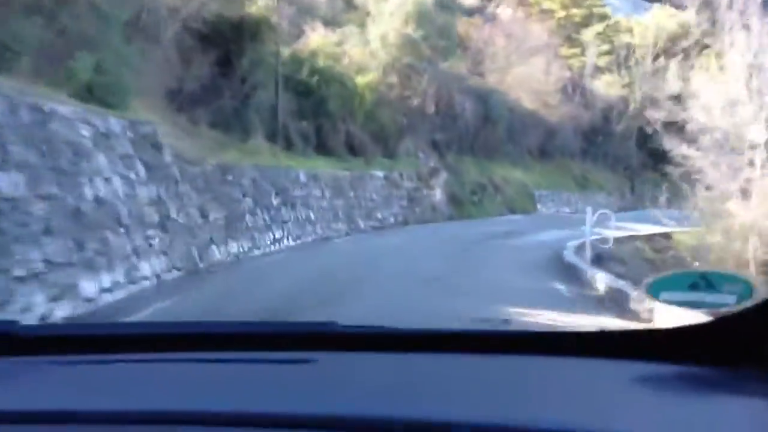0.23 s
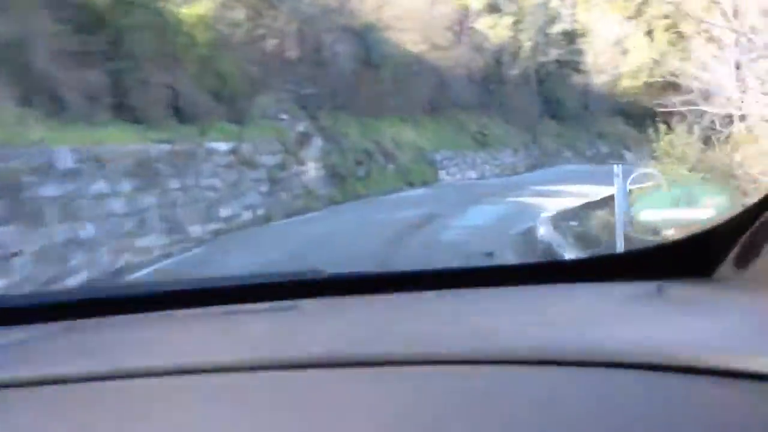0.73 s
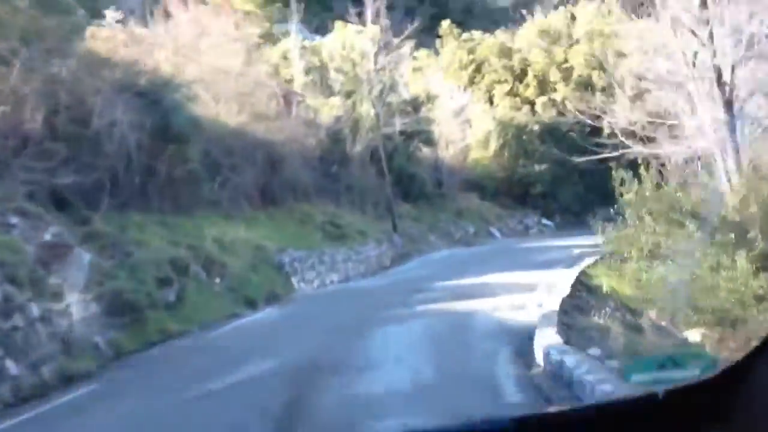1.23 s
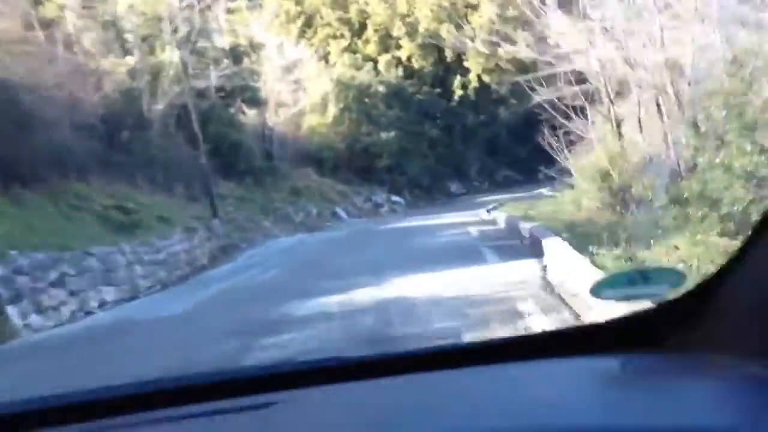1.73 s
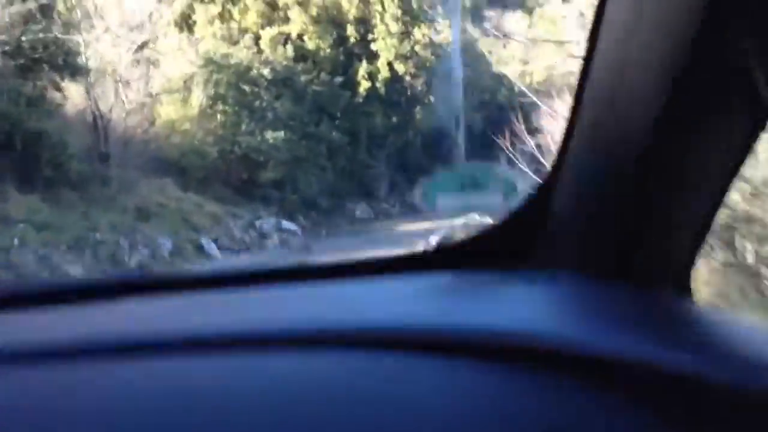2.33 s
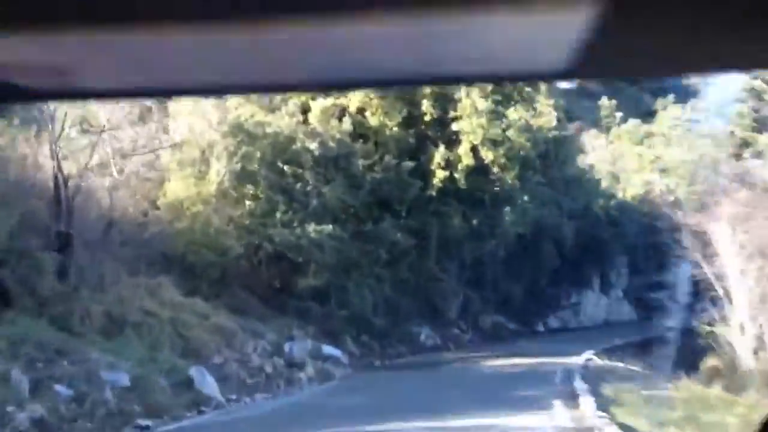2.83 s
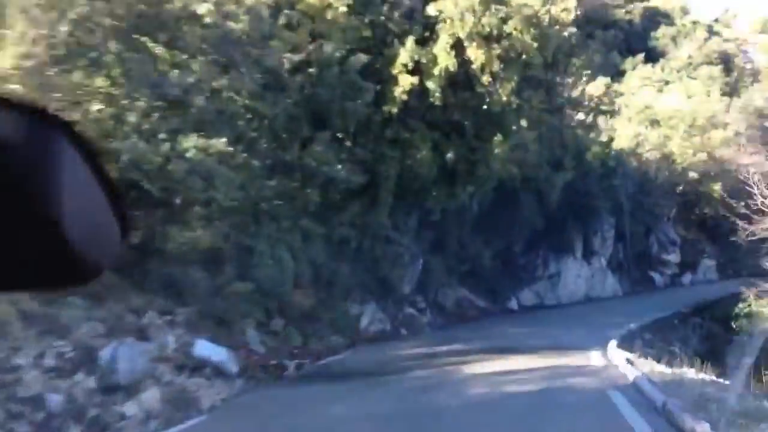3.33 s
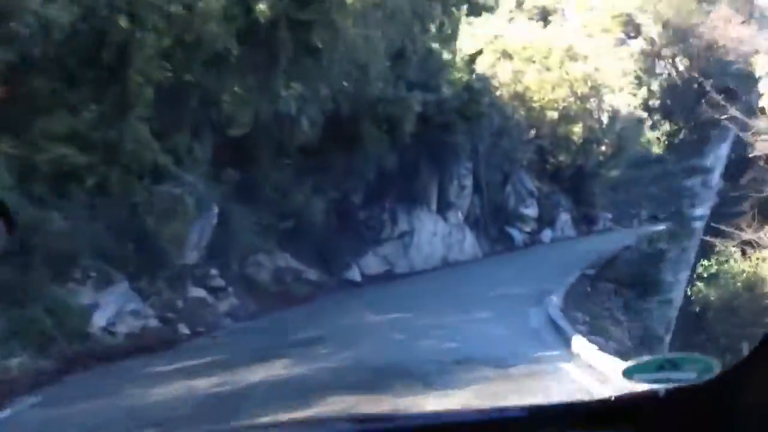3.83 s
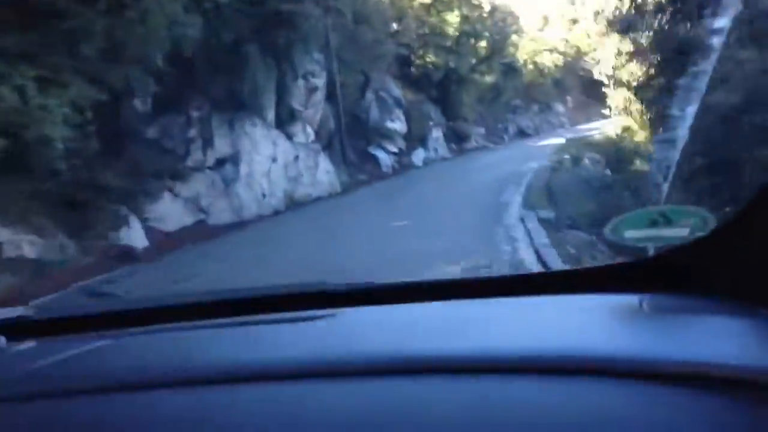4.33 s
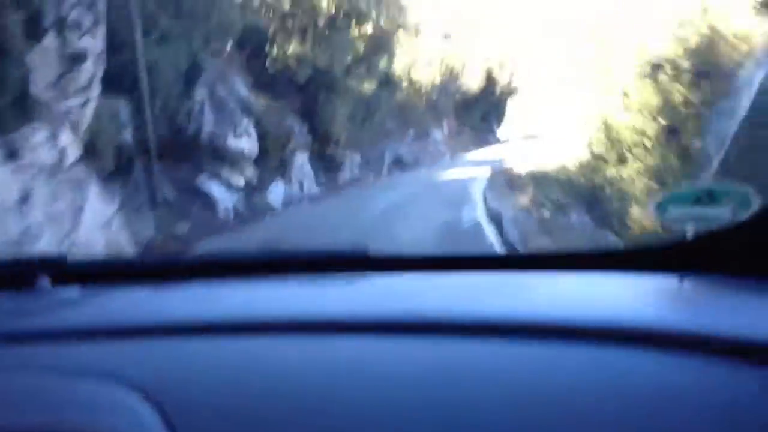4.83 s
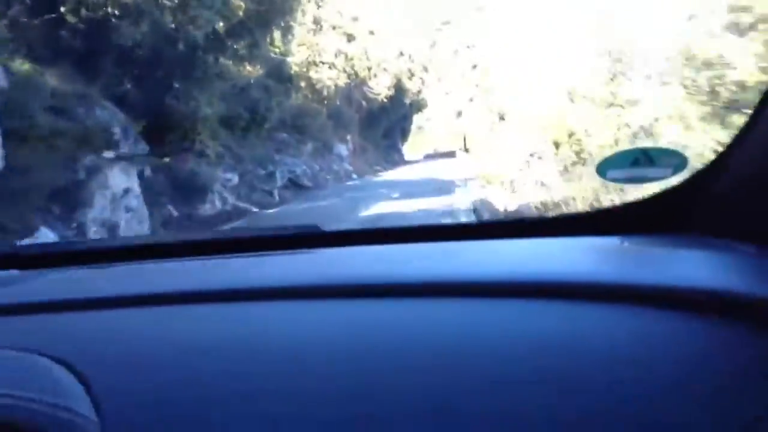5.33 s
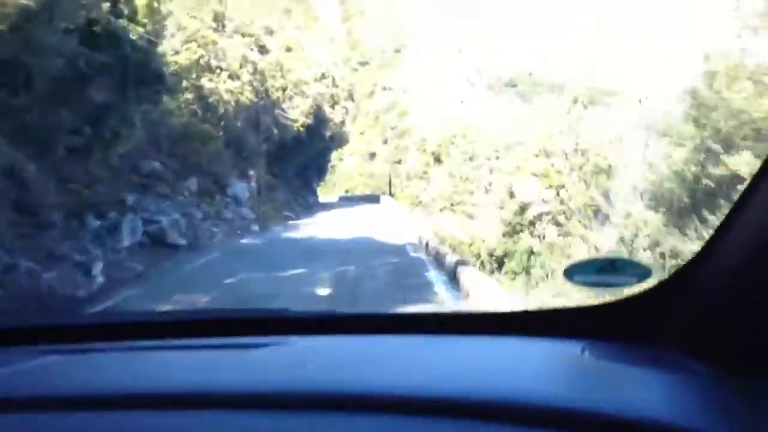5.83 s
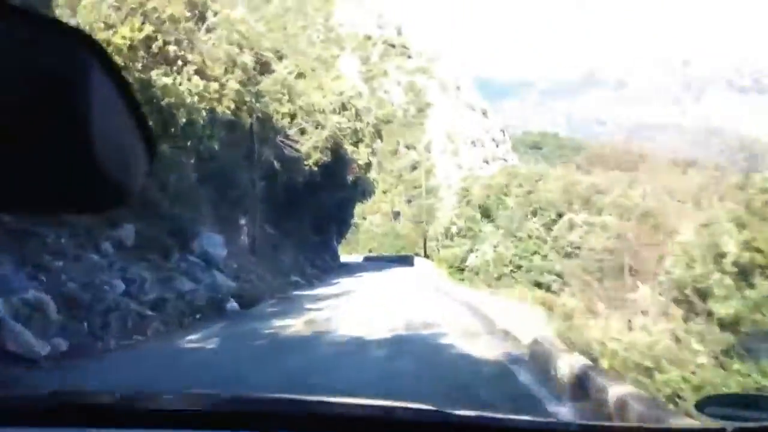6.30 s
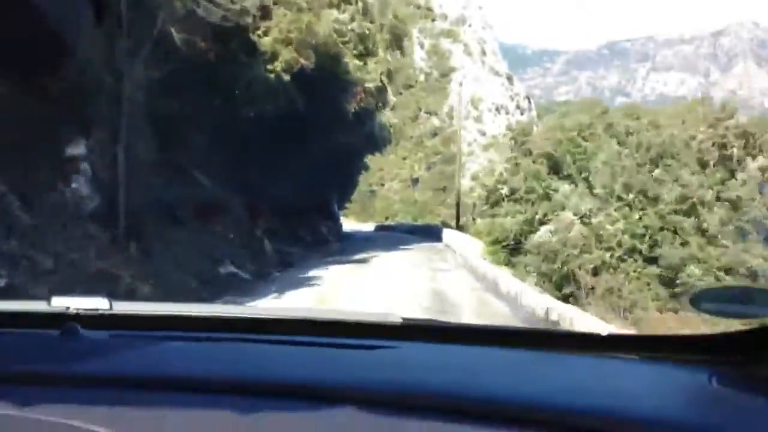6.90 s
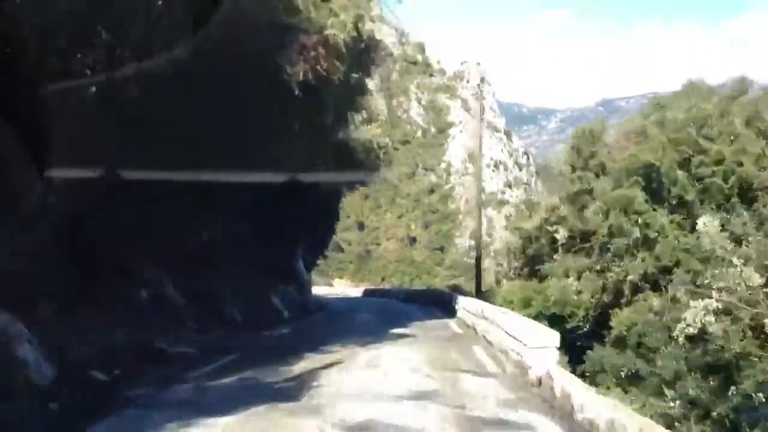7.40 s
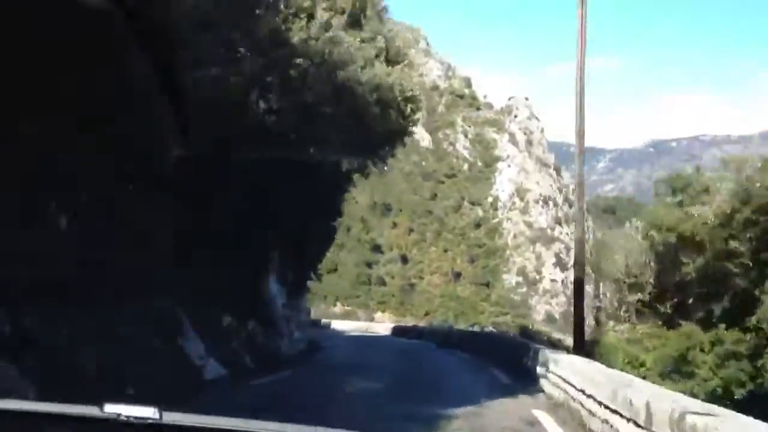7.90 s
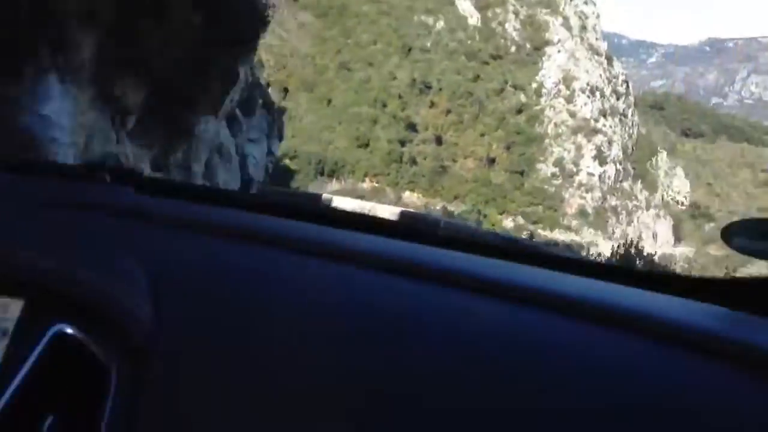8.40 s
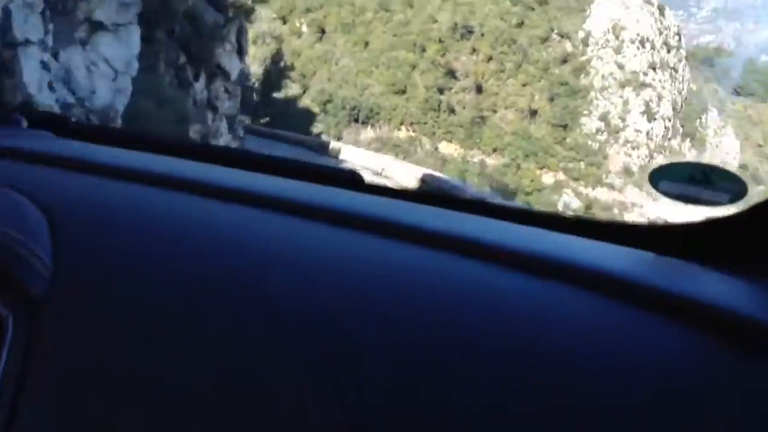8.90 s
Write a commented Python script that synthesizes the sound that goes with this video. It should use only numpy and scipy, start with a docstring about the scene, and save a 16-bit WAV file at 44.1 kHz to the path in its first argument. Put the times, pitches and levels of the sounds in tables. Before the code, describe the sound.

Heard from the front seat of a car on a winding road, a low engine boom dominates, sagging at first, weakest around one and a half seconds, then slowly recovering and climbing to a peak near seven before easing. Muffled tyre rumble and roar run throughout, with fine hiss swelling over damp patches. Short dull bumps and tiny bright ticks interrupt, and the strongest thump comes in the last bend.

```python
"""Inside a car on a winding mountain road: a four-cylinder engine booms in the cabin, rises and falls in pitch.
The engine is a sine at the firing rate plus weaker orders and noise rasp; the tyres are shaped noise that
roars on asphalt, hisses more over damp stretches and murmurs in the last bend.
Bumps thump as decaying sines, grit and trim tick as short noise bursts, and trim squeaks as sinking sines."""
import sys
import numpy as np
from scipy import signal
from scipy.fft import rfft, irfft, next_fast_len
from scipy.io import wavfile
from scipy.ndimage import uniform_filter1d, map_coordinates

SR = 44100
rng = np.random.default_rng(int(sys.argv[2]) if len(sys.argv) > 2 else 0)


def generate_wav(signal):
    """Clip the signal to [-1, 1] and save it as 16-bit WAV at the path in sys.argv[1]."""
    frames = np.transpose(np.atleast_2d(signal))
    scaled = np.clip(frames, -1, 1) * 32767
    pcm = np.round(scaled).astype(np.int16)
    wavfile.write(sys.argv[1], SR, pcm)


N = 403515
CRUISE_HZ = 155  # firing rate at cruising speed
ENTER_S, LEAVE_S = 0.078, 0.14  # stretch of road: rise time, decay constant


def amp(db):
    """Decibels to gain."""
    return 10 ** (np.asarray(db) / 20)


def unit(x):
    """Scale to rms 1."""
    return x / np.sqrt(np.mean(x ** 2) + 1e-20)


def curves(rows):
    """One value per sample for each column after the time."""
    s, *cols = np.transpose(rows)
    return [np.interp(np.arange(N) / SR, s, c) for c in cols]


def wobble(rate_hz):
    """Smooth random curve, rate_hz knots a second."""
    knots = rng.standard_normal(int(N * rate_hz / SR) + 4)
    return map_coordinates(knots, [np.arange(N) * rate_hz / SR])


def filtered(x, response):
    """x times a response of frequency."""
    m = next_fast_len(len(x) + 8192)
    return irfft(rfft(x, m) * response(np.fft.rfftfreq(m, 1 / SR)), m)[:len(x)]


def coloured(x, spectrum):
    """x shaped by (frequency [Hz], level [dB]) points, at rms 1."""
    f, db = np.transpose(spectrum)

    def response(hz):
        shape_db = np.interp(np.log(hz + 1), np.log(f), db)
        rolloff_db = 60 * np.maximum(hz / f[-1] - 1, 0)  # above the last point
        return amp(shape_db - rolloff_db)

    return unit(filtered(x, response))


def patchy(depth_db):
    """White noise whose gain drifts in patches of time and frequency."""
    z = signal.stft(rng.standard_normal(N), nperseg=1024)[2]
    field = uniform_filter1d(rng.standard_normal(z.shape), size=6, axis=0)
    field = uniform_filter1d(field, size=10, axis=1)
    return signal.istft(z * amp(depth_db * unit(field)), nperseg=1024)[1][:N]


def band(centre_hz, half_width_hz, size):
    """Noise in one resonance, at rms 1."""
    noise = rng.standard_normal(size)
    return unit(filtered(noise, lambda hz: 1 / (1 + ((hz - centre_hz) / half_width_hz) ** 2)))


def add(track, s, sound):
    """Mix a sound into the track at time s."""
    part = track[max(round(s * SR), 0):][:len(sound)]
    part += sound[:len(part)]


def stretches(rows):
    """Gain of stretches of road: quick rise up to the start, hold, dying tail."""
    t = np.arange(N) / SR
    gain = np.zeros(N)
    for s, length_s, db in rows:
        rise = np.clip(1 + (t - s) / ENTER_S, 0, 1)
        tail = np.exp(-np.maximum(t - s - length_s, 0) / LEAVE_S)
        gain += amp(db) * rise * tail
    return gain


# engine load: (time [s], level over neutral throttle [dB])
ENGINE_LOAD = [(0, -7), (.58, -15.5), (.67, -1.5), (2.45, -1.5), (2.8, 4), (3.2, 0), (4.8, 0), (5.6, 3.5),
               (6.3, 8), (6.7, 2.5), (7.05, 4), (7.3, 1.5), (7.8, -1.5), (8.5, -4), (9.15, -5.5)]
# cabin response, one broad peak and a narrow null: (firing rate [Hz], boom before BOOM_TRIM_DB [dB])
CABIN_BOOM = [(135, -32), (140, -32), (147, -27.5), (151.5, -22.5), (157, -20), (166, -23), (179, -22.5),
              (186, -32), (191, -26)]
# engine orders: (multiple of firing rate [-], relative level [dB])
ENGINE_ORDERS = [(.5, -18), (.75, -6), (1.25, -6), (1.5, -9), (1.75, -6), (2, 0), (2.25, -7), (2.5, -7.5),
                 (2.75, -7.5), (3, -4), (3.25, -13.5), (3.5, -11.5), (3.75, -12), (4, -9.5), (4.25, -7.5),
                 (4.5, -7.5), (4.75, -14), (5, -8.5), (5.25, -7.5), (6, -6.5)]
# cabin resonances: (centre [Hz], full width [Hz], lift [dB])
CABIN_RESONANCES = [(283, 12, 5), (382, 24, 7), (544.6, 26, 8.5)]
# intake and valve noise: (frequency [Hz], relative density [dB per Hz])
RASP_SPECTRUM = [(700, -24.5), (1200, -4), (1450, -3.5), (1700, -0.5), (1950, -3.5), (2200, -4.5),
                 (2500, -11), (2900, -11), (3330, -10), (3750, -15), (4400, -15), (5900, -23.5),
                 (7800, -32), (9500, -50)]
BOOM_TRIM_DB = 0.32
ORDERS_DB = -45.5  # at neutral throttle
RASP_DB, RASP_DB_PER_HZ = -41, 0.0236  # at cruising speed; growth with firing rate
OVERRUN_BELOW_DB = -3  # under this load the wheels drive the engine
OVERRUN_BOOM, OVERRUN_RASP = 0.51, 0.13  # dB more for each dB further down


def engine(firing_hz, road_db):
    """Firing rate booms; weaker orders swell in cabin resonances; intake and valves rasp with the firing."""
    load_db, = curves(ENGINE_LOAD)
    overrun_db = np.maximum(OVERRUN_BELOW_DB - load_db, 0)
    phase = 2 * np.pi * np.cumsum(firing_hz) / SR

    boom_db = np.interp(firing_hz, *np.transpose(CABIN_BOOM)) + OVERRUN_BOOM * overrun_db
    flutter = amp(-44.5) * wobble(24)  # relatively stronger when the boom is weak
    boom_gain = amp(boom_db + BOOM_TRIM_DB + 0.93 * wobble(20)) + flutter
    boom_phase = phase + .11 * wobble(5.5) + .03 * wobble(30)
    boom = boom_gain * np.sqrt(2) * np.sin(boom_phase)

    # unequal cylinders put lines at quarters of the firing rate
    orders = np.zeros(N)
    for multiple, db in ENGINE_ORDERS:
        lift_db = np.zeros(N)
        for hz, width_hz, gain_db in CABIN_RESONANCES:
            lift_db += gain_db / (1 + (2 * (multiple * firing_hz - hz) / width_hz) ** 2)
        order_gain = amp(db + lift_db + 1.9 * wobble(8))
        order_phase = multiple * phase + 0.18 * wobble(9) + rng.uniform(0, 2 * np.pi)
        orders += order_gain * np.sin(order_phase)

    speed_db = RASP_DB_PER_HZ * (firing_hz - CRUISE_HZ)
    rasp_db = RASP_DB + 0.95 * road_db + speed_db + OVERRUN_RASP * overrun_db
    pulsing = 1 + 0.15 * np.cos(phase) + 0.056 * np.cos(phase / 2)
    rasp = coloured(patchy(depth_db=1.12) * pulsing, RASP_SPECTRUM)
    return boom + amp(ORDERS_DB + load_db) * orders + amp(rasp_db) * rasp


# broken asphalt: (start [s], length [s], rumble [dB])
ROUGH_STRETCHES = [(1.22, 0.24, -35.5), (6.55, 0.35, -41)]
# car body, suspension, wheel arches: (frequency [Hz], relative density [dB per Hz])
BODY_SPECTRUM = [(20, -52), (31, -42), (42, -22), (60, -23), (80, -13.5), (100, -8.5), (130, 2), (170, 3.5),
                 (230, -13.5), (400, -55)]
RUMBLE_SPECTRUM = [(120, -21.5), (160, 8.5), (190, 2.5), (230, 0), (280, -1), (325, -1.5), (430, -6),
                   (600, -17), (1200, -61)]
ROAR_SPECTRUM = [(220, -36), (380, -7.5), (480, -4.5), (550, -2.5), (610, -3.5), (700, -1), (870, -2.5),
                 (950, -3), (1100, -5.5), (1500, -10), (1950, -39), (3300, -100)]
BODY_DB, RUMBLE_DB, ROAR_DB = -35.5, -35.5, -36.5  # at road_db = 0


def tyres(road_db):
    """Rough asphalt hums in the body, shakes the suspension in surges and roars in the wheel arches."""
    body_gain = amp(BODY_DB + 0.31 * road_db + 1.0 * wobble(12))
    body = body_gain * coloured(rng.standard_normal(N), BODY_SPECTRUM)
    steady = amp(RUMBLE_DB + 0.63 * road_db + 0.4 * wobble(7))
    shaking = np.hypot(steady, stretches(ROUGH_STRETCHES))
    surges = amp(0.66 * wobble(16))
    rumble = shaking * surges * coloured(patchy(depth_db=-0.36), RUMBLE_SPECTRUM)
    roar = amp(ROAR_DB + road_db) * coloured(patchy(depth_db=1.5), ROAR_SPECTRUM)
    return body + rumble + roar


# damp stretches: (start [s], length [s], hiss [dB])
DAMP_STRETCHES = [(.27, 0.55, -47), (4.12, 0.33, -43.5), (5.32, 1.48, -48.5)]
# tread hiss: (frequency [Hz], relative density [dB])
HISS_SPECTRUM = [(1500, -17), (2600, -1.5), (3200, 0), (3900, -1.5), (5300, -1), (6800, -3), (8000, -7.5),
                 (9000, -13), (10000, -18.5), (12500, -16), (15000, -19.5)]
HISS_DB, HISS_DB_PER_HZ = -52, 0.0448  # at cruising speed; growth with firing rate
DROPS_PER_S = 120


def spray(firing_hz, road_db):
    """Tread peels off the road: hiss with fine spatter, growing with speed and lifted where it is damp."""
    dry_gain = amp(HISS_DB + 0.91 * road_db + HISS_DB_PER_HZ * (firing_hz - CRUISE_HZ))
    gain = np.hypot(dry_gain, stretches(DAMP_STRETCHES)) * amp(0.79 * wobble(16))
    drops = (rng.random(N) < DROPS_PER_S / SR) * rng.standard_normal(N)
    return gain * coloured(rng.standard_normal(N) + .2 * unit(drops), HISS_SPECTRUM)


# tread scrub in the last bend: (time [s], level [dB])
SCRUB_LEVEL = [(7.7, -110), (7.95, -60), (8.08, -44), (8.24, -39), (8.36, -53), (8.7, -51), (9.15, -41)]


def scrub():
    """Tread blocks slip sideways in the bend and murmur in one narrow band."""
    scrub_db, = curves(SCRUB_LEVEL)
    return amp(scrub_db) * band(960, 60, size=N)


# bumps in the road: (time [s], level before BUMP_TRIM_DB [dB])
ROAD_BUMPS = [(1.449, -20), (1.552, -18.5), (5.481, -17), (6.092, -17), (6.994, -24), (8.256, -12)]
# suspension modes: (frequency [Hz], relative level [dB], t60 [s])
THUMP_MODES = [(113, -7.5, 0.084), (213, 0.5, 0.045), (291, 4.5, 0.043), (352, -11, 0.049),
               (463, -21, 0.072)]
BUMP_TRIM_DB, BUMP_ATTACK_S = 4.5, 0.0055
PUFF_DB, PUFF_T60_S = -10.5, 0.056


def bumps():
    """Each bump sends a short dull thump through the suspension, with a puff from the tyre."""
    out, t = np.zeros(N), np.arange(SR // 8) / SR
    attack = (1 - np.exp(-t / BUMP_ATTACK_S)) ** 2
    for s, db in ROAD_BUMPS:
        ring = np.zeros(len(t))
        for hz, level_db, t60_s in THUMP_MODES:
            ring += amp(level_db - 60 * t / t60_s) * np.sin(2 * np.pi * hz * t)
        puff = amp(PUFF_DB - 60 * t / PUFF_T60_S) * band(360, 130, size=len(t))
        add(out, s, amp(db + BUMP_TRIM_DB) * (ring + puff) * attack)
    return out


# placed ticks: (time [s], level before TICK_TRIM_DB [dB], pitch [Hz], length [s], high edge [dB])
PLACED_TICKS = [(0.379, -40, 6000, 0.011, -12.5), (0.75, -40.5, 5200, 0.021, -15),
                (.827, -43, 6000, .008, -13), (2.236, -45.5, 6000, .009, -15), (2.978, -49, 6800, .006, -8),
                (3.047, -42.5, 6200, .015, -13), (3.141, -50.5, 7000, 0.012, -3),
                (3.202, -34, 5600, .003, -22), (3.483, -44, 6000, .003, -16),
                (3.876, -42.5, 6660, 0.004, -11), (4, -46.5, 7500, .0074, -5),
                (5.29, -42.5, 7990, .006, 1.5), (6.404, -38, 5050, .016, -13),
                (8.077, -40.5, 6200, .011, -11.5)]
TICK_TRIM_DB = -2.0
# random ticks between them; level before TICK_TRIM_DB
GRIT_PER_S, GRIT_DB, GRIT_SPREAD_DB = 1.3, -50, 2.5
GRIT_HZ, GRIT_S, GRIT_EDGE_DB = 6000, .006, -13.5


def ticks():
    """Tiny scrapes of grit and trim: a bright core and a fine high edge, gone in milliseconds."""
    out, t = np.zeros(N), np.arange(SR // 10) / SR
    grit = []
    for when, force in rng.random((round(GRIT_PER_S * N / SR), 2)):
        grit_db = GRIT_DB + GRIT_SPREAD_DB * (2 * force - 1)
        grit.append((when * N / SR, grit_db, GRIT_HZ, GRIT_S, GRIT_EDGE_DB))
    for s, db, hz, length_s, edge_db in [*PLACED_TICKS, *grit]:
        u = 3 * t / length_s
        core = band(hz, 1500, size=len(t))
        edge = amp(edge_db) * band(14000, 3500, size=len(t))
        envelope = u * np.exp(1 - u)  # peaks at a third of the length
        add(out, s, amp(db + TICK_TRIM_DB) * envelope * (core + edge))
    return out


# trim squeaks: (time [s], length [s], pitch [Hz], level [dB])
TRIM_SQUEAKS = [(1.073, .04, 8020, -59.5), (1.204, .048, 7980, -56)]


def squeaks():
    """Plastic rubbing on plastic sings a thin, slightly sinking note."""
    out = np.zeros(N)
    for s, length_s, hz, db in TRIM_SQUEAKS:
        u = np.linspace(0, 1, round(length_s * SR))
        phase = 2 * np.pi * np.cumsum(hz * (1 - .012 * u)) / SR
        add(out, s, amp(db) * np.sin(np.pi * u) * np.sin(phase))
    return out


# engine speed: (time [s], firing rate [Hz])
FIRING_RATE = [(0, 146.8), (.55, 142.8), (1, 137.8), (1.55, 134.3), (2.5, 139.1), (2.82, 144.4),
               (3.38, 146.8), (3.6, 150.8), (4.45, 151.9), (5.05, 156), (6.15, 178.6), (6.6, 188),
               (7.05, 192), (7.55, 185.1), (7.73, 175.4), (8.14, 167.5), (8.42, 159.3), (9.15, 152)]
# tyre excitation by the asphalt: (time [s], level over cruising [dB])
ROAD_LEVEL = [(0, 0.5), (1.05, -1.5), (1.35, -1.5), (1.75, -2.5), (2.42, -3), (2.7, -2.1), (3.3, -2),
              (3.65, -0.9), (5.15, 0.6), (5.42, 3.8), (5.85, 1.5), (6.1, 4), (6.65, 3), (6.95, 0.9),
              (7.7, 0.2), (8.18, 1.5), (8.5, 0.1), (9.15, 3)]


def scene():
    """Mix at the front seat; the car stays in one gear, so the firing rate is also its speed."""
    firing_hz, = curves(FIRING_RATE)
    road_db, = curves(ROAD_LEVEL)
    road = tyres(road_db) + spray(firing_hz, road_db) + scrub() + bumps()
    return (engine(firing_hz, road_db) + road + ticks() + squeaks())[None]


TOP_HZ = 15330


def record(dry):
    """Band limit: nothing passes from TOP_HZ up."""
    return filtered(dry[0], lambda hz: hz < TOP_HZ)[None]


dry = scene()
out = record(dry)
generate_wav(out)
```